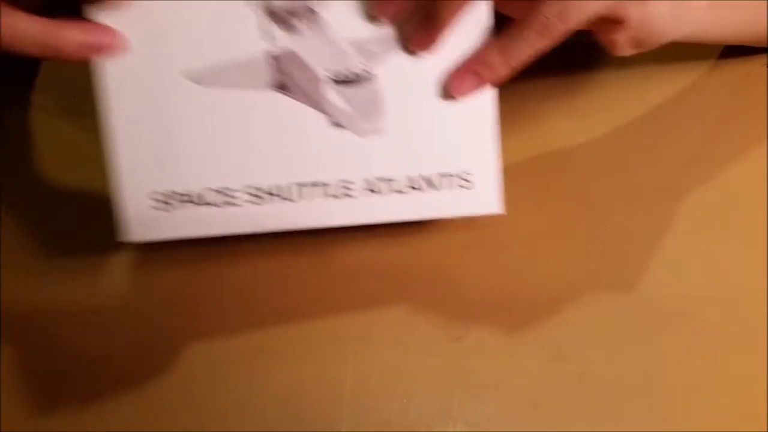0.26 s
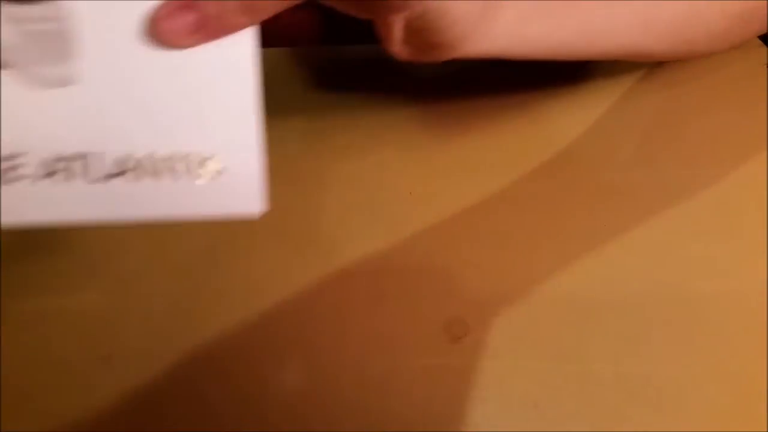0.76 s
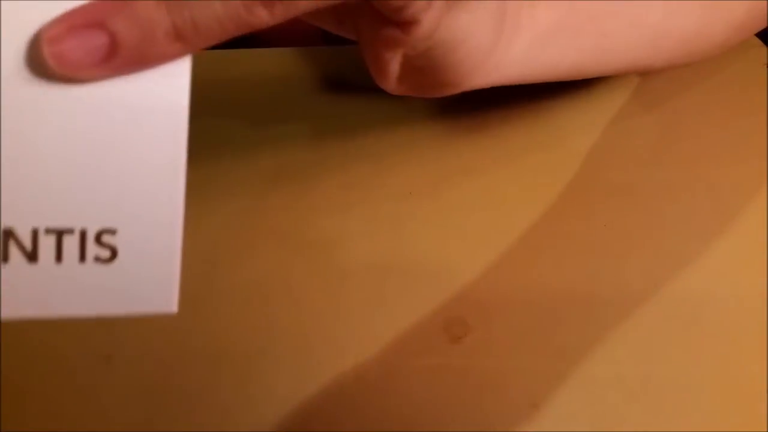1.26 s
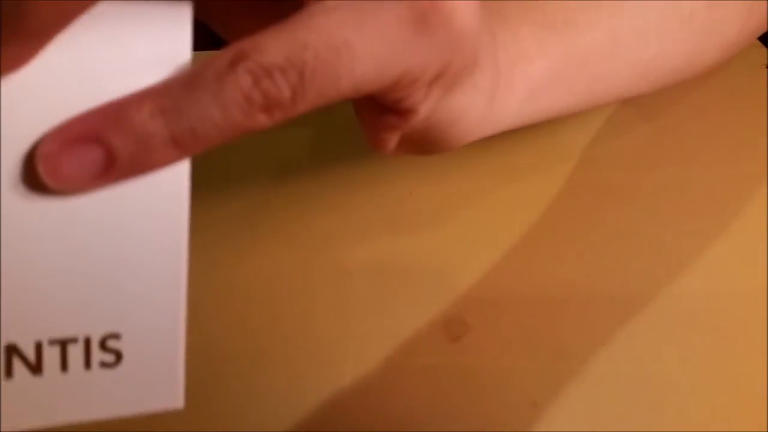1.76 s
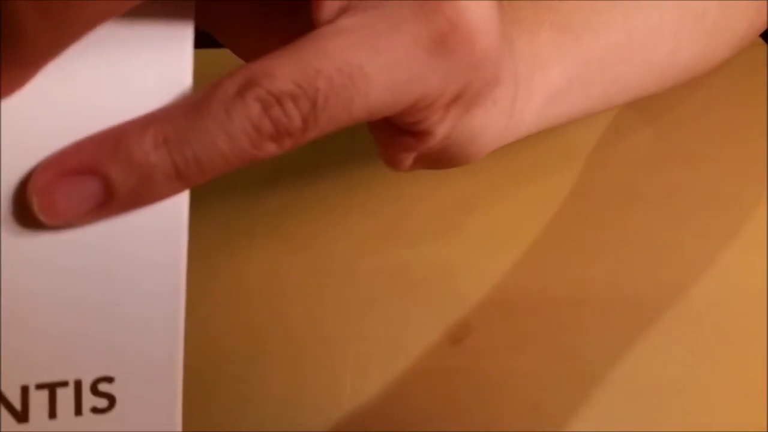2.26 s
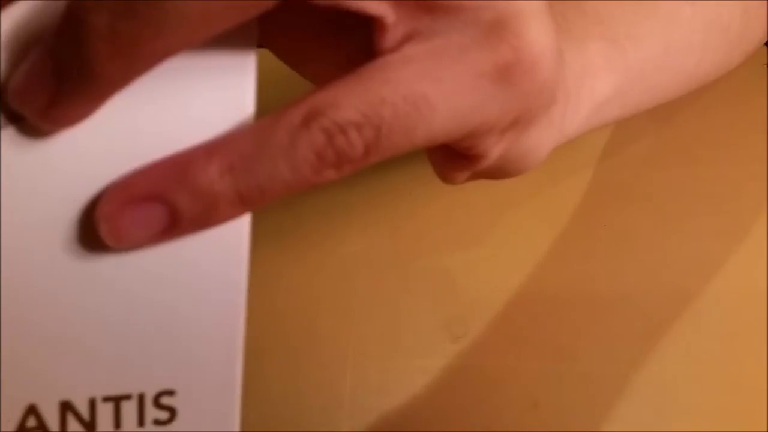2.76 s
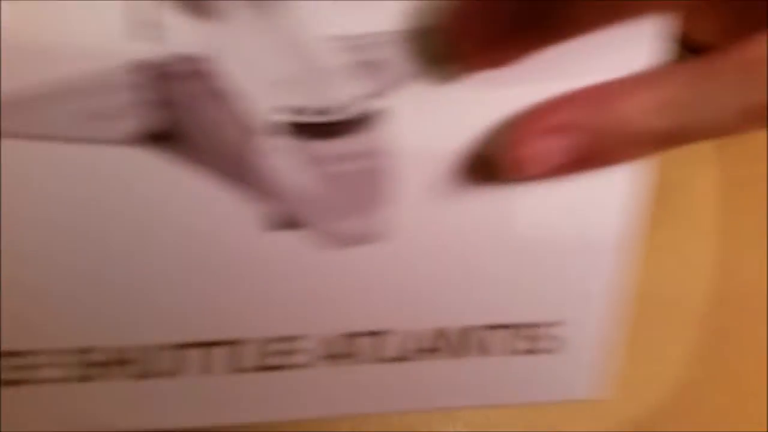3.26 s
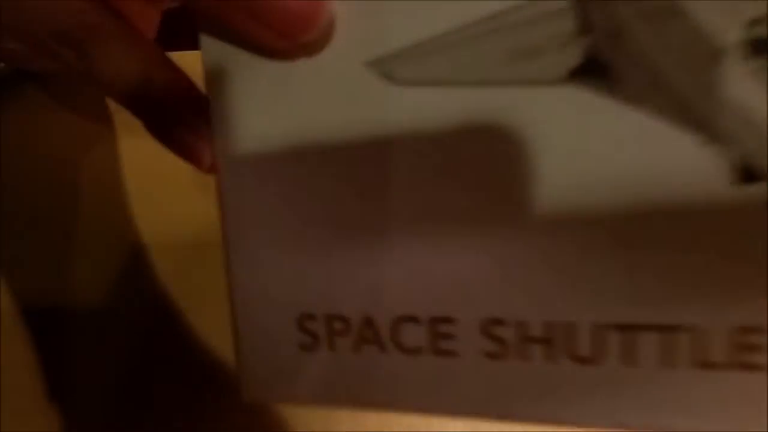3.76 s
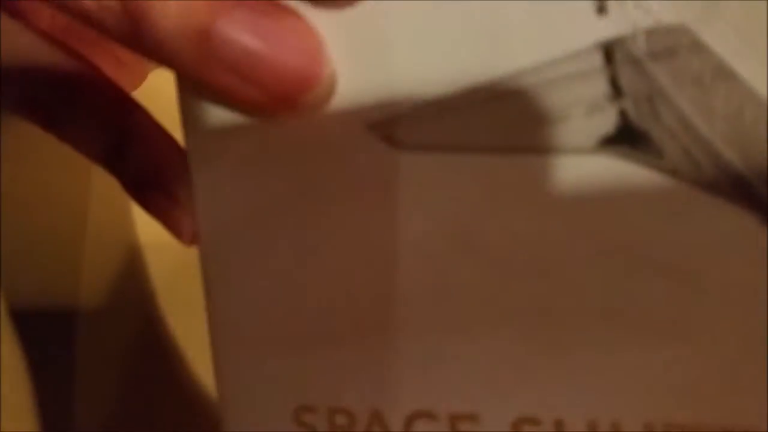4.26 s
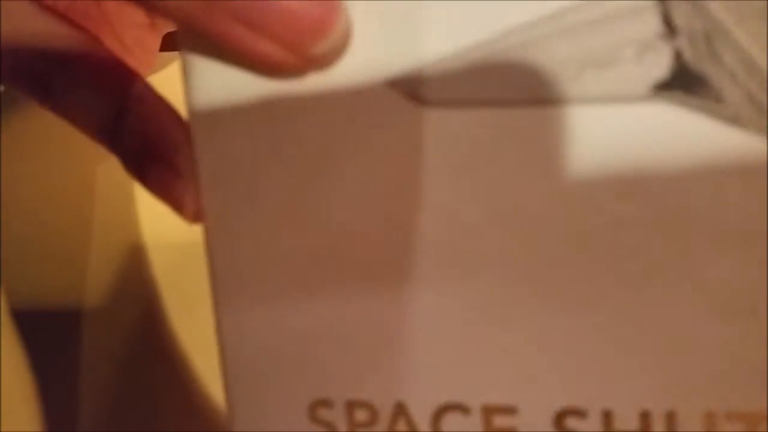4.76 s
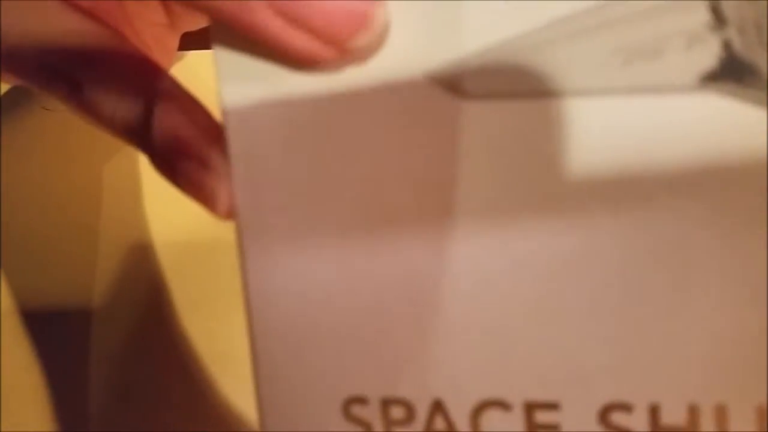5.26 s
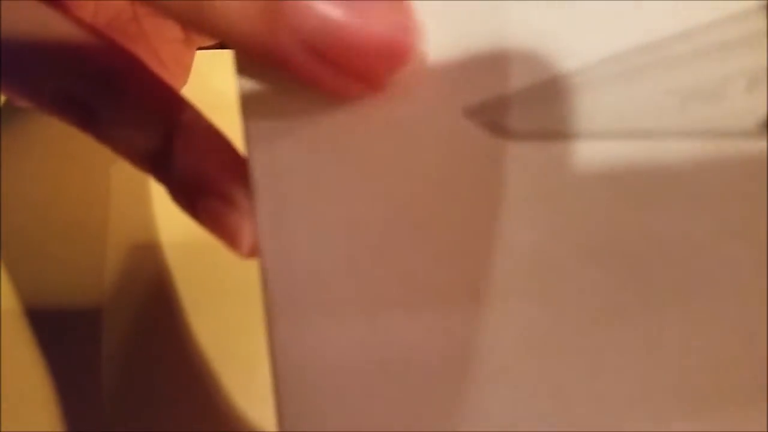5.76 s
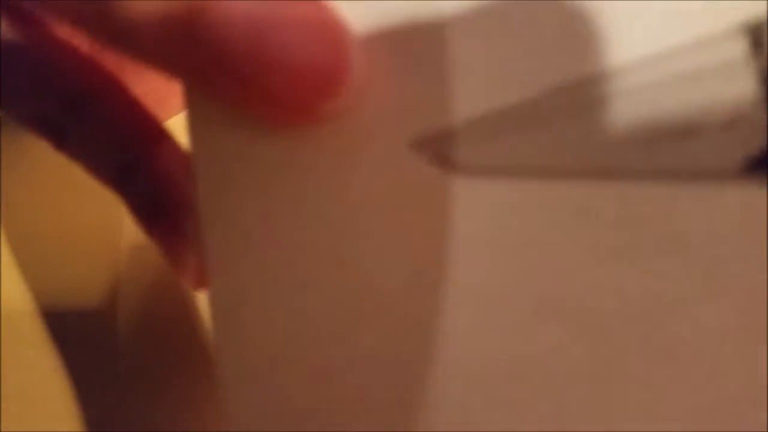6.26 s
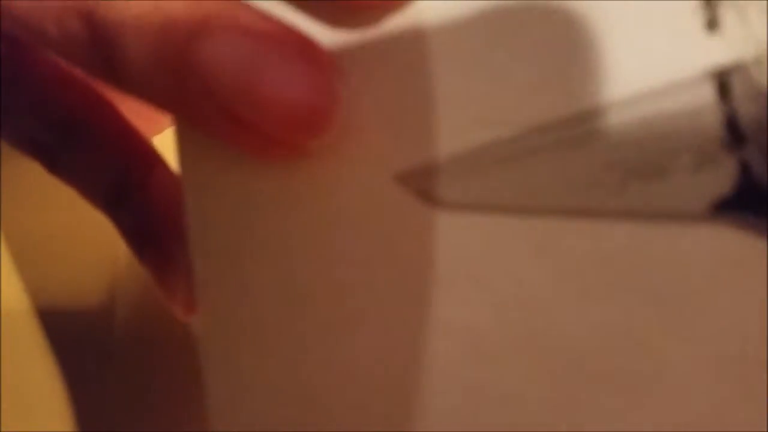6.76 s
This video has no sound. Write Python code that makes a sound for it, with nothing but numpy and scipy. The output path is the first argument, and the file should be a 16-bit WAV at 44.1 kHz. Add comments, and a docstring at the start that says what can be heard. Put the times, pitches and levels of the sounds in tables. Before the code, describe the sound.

Very close to a stereo microphone pair in a quiet indoor room, fingernails tap a small hollow cardboard box. After a faint opening scrape, firm clicky taps come in uneven groups of three on the left, with brief nail scratches between. The box then shifts to the right with soft skin rubbing, and the tapping becomes mostly quieter, denser and more thuddy, with a few strong knocks.

```python
"""Fingernails on a cardboard box

In a quiet room, nails drum on a small box held close to a pair of microphones, first left, then right.
Each tap is a soft push that rings the damped modes of the box, plus a click and short rattle of the nail.
Between taps, nails drag over the card in many small slips, and skin slides on it as shaped noise.
Taps and drags get a tail of sparse reflections; a weaker copy of everything follows a thirtieth
of a second later."""
import sys
import numpy as np
from scipy import signal
from scipy.fft import rfft, irfft
from scipy.io import wavfile
from scipy.ndimage import uniform_filter1d

SR = 44100
rng = np.random.default_rng(int(sys.argv[2]) if len(sys.argv) > 2 else 0)


def master_out(mix):
    """Clip the mix to full scale and print it as 16-bit PCM to the path in sys.argv[1]."""
    frames = np.transpose(np.atleast_2d(mix))
    ceiling = np.clip(frames, -1, 1)
    pcm = np.round(ceiling * 32767).astype(np.int16)
    wavfile.write(sys.argv[1], SR, pcm)


N = 308700  # samples: 7 s


def gain_of(db):
    """Turns dB into an amplitude factor."""
    return 10 ** (np.asarray(db) / 20)


def evened(x):
    """Scales to rms 1."""
    return x / np.sqrt(np.mean(x ** 2) + 1e-20)


def read(points, hz):
    """Reads a table of (Hz, value) along a log-frequency axis."""
    f, value = np.transpose(points)
    return np.interp(np.log(hz + 1), np.log(f + 1), value)


def delayed(hz, seconds):
    """Spectrum of a pure delay; negative seconds move a sound earlier."""
    return np.exp(-2j * np.pi * hz * seconds)


def stroke_gain(middle, length, db):
    """Gain of one stroke: a smooth rise to db at the middle, then a fall."""
    u = np.clip((np.arange(N) / SR - middle) / length, -.5, .5)
    return gain_of(db) * np.cos(np.pi * u) ** 2


def ring(modes, hz, far):
    """Velocity response of damped modes at the nearer microphone (far = 0), or farther off as far grows."""
    s, out = 2j * np.pi * hz, 0
    for mode_hz, t60, db, far_db, way in modes:
        size = np.sign(way) * gain_of(db + far * far_db)
        out = out + size * s / ((s + np.log(1000) / t60) ** 2 + (2 * np.pi * mode_hz) ** 2)
    return out


def noise(colour, same, patchy_db, size):
    """Two channels of random short-time spectra whose level drifts in patches of time and frequency."""
    frames, hz = 4 * N // size + 6, np.fft.rfftfreq(size, 1 / SR)
    a, b, c, d, patches = rng.standard_normal((frames, len(hz), 5)).T
    patches = uniform_filter1d(patches, size=size // 64, axis=0)  # over frequency
    patches = evened(uniform_filter1d(patches, size=10240 // size, axis=1))  # over time
    same = np.clip(read(same, hz), -1, 1)[:, None]
    left = a + 1j * b
    right = same * left + np.sqrt(1 - same ** 2) * (c + 1j * d)
    z = np.array([left, right]) * gain_of(read(colour, hz)[:, None] + patchy_db * patches)
    return evened(signal.istft(z, nperseg=size, noverlap=3 * size // 4)[1][:, :N])


# Place of the box before the pair. Each row: time in seconds, lead of the left microphone in ms
# (negative when the right one leads).
BOX_PLACE = [(0, 0.15), (1, 0.4), (3.3, 0.37), (3.7, -0.38), (4.6, -0.52), (7, -0.46)]


def left_lead_ms(s):
    """Time by which sound from the box reaches the left microphone first."""
    return np.interp(s, *np.transpose(BOX_PLACE))


def panned(x):
    """Leans a friction sound to the microphone nearer the hands, by level alone."""
    left_over_right_db = 11 * left_lead_ms(np.arange(N) / SR)  # 11 dB per ms of lead
    return x * gain_of(np.outer([.5, -.5], left_over_right_db))


# Colour of the quiet behind the box. Each row: frequency in Hz, relative level in dB per Hz.
FLOOR_COLOUR = [(15, -46), (25, -11.5), (38, -18.5), (53, -3.5), (149, -4.5), (175, -14.5), (317, -15),
                (1020, -22.5), (1190, -24), (1400, -25), (5880, -30.5), (6740, -29.5), (16000, -31)]
# Likeness of that quiet at the two microphones. Each row: frequency in Hz, left-right correlation.
FLOOR_LIKENESS = [(60, 0.38), (240, 0.54), (950, 0.0098), (3770, -0.26), (15000, 0.15)]
FLOOR_DB = -62.5  # rms


def floor():
    """Steady, mostly low background noise whose likeness left to right changes with frequency."""
    return gain_of(FLOOR_DB) * noise(FLOOR_COLOUR, FLOOR_LIKENESS, patchy_db=2.13, size=2048)


# Decay of the room around the box. Each row: frequency in Hz, time to fall 60 dB in seconds.
ROOM_DECAY = [(100, 0.16), (300, 0.24), (800, 0.19), (2000, 0.25), (6000, 0.15)]
ROOM_DB = -13.5  # energy of the left tail


def room(x):
    """Sparse reflections of random sign, each band dying at its own speed; the bass is alike left and right."""
    hits = np.zeros((2, 22050))
    at = np.arange(160, 22030, 20) + rng.integers(0, 20, (2, 1094))  # one in every 20 samples
    np.put_along_axis(hits, at, rng.choice([-1., 1.], at.shape), 1)
    hz, t, z = signal.stft(hits, SR, nperseg=256)
    same = (1 / (1 + (hz / 900) ** 2))[:, None]
    z = np.array([z[0], same * z[0] + np.sqrt(1 - same ** 2) * z[1]])
    fade = gain_of(-60 * t / read(ROOM_DECAY, hz)[:, None])
    tail = signal.istft(z * fade, SR, nperseg=256)[1]
    tail = tail / np.linalg.norm(tail[0])
    return gain_of(ROOM_DB) * signal.fftconvolve(x.mean(0)[None], tail, axes=1)[:, :N]


# Colour of skin on card. Each row: multiple of the stroke's brightest frequency, relative level in dB per Hz.
SLIDE_COLOUR = [(.2, -11.5), (.55, -5.5), (1, -2), (1.6, -8), (4, -24)]
# Skin sliding on the glossy card. Each row: middle in seconds, length in seconds,
# level at the middle in dB before panning, brightest frequency in Hz.
SLIDES = [(0.198, 0.32, -67.5, 5000), (0.545, 0.23, -68.5, 7440), (0.746, 0.034, -69, 4970),
          (3.141, 0.22, -61, 4300), (3.267, 0.087, -64, 5770), (3.354, 0.2, -58.5, 7000),
          (3.569, 0.25, -62.5, 8100), (3.796, 0.03, -64, 5970), (3.908, 0.13, -64, 8440),
          (5.976, 0.17, -72, 2490), (6.547, 0.08, -61, 9100), (6.652, 0.05, -67, 8100),
          (6.819, 0.25, -63, 8500), (7, 0.16, -61, 8200)]


def slide():
    """Fine friction hiss, each stroke with its own brightness, little alike at the two microphones."""
    hiss = noise([(100, 0), (16000, 0)], [(1000, 0.37), (10000, 0.15)], patchy_db=4.0, size=512)
    hz, t, z = signal.stft(hiss, SR, nperseg=512)
    frame_at = np.minimum(np.round(t * SR).astype(int), N - 1)
    shape = 0
    for middle, length, db, top_hz in SLIDES:
        points = [(top_hz * multiple, colour_db) for multiple, colour_db in SLIDE_COLOUR]
        colour = evened(gain_of(read(points, hz)))
        shape = shape + np.outer(colour, stroke_gain(middle, length, db)[frame_at])
    return panned(signal.istft(z * shape, SR, nperseg=512)[1][:, :N])


# Nails dragging over the card. Each row: middle in seconds, length in seconds,
# level at the middle in dB before panning and room.
DRAGS = [(0.008, 0.19, -52.5), (0.149, 0.089, -54.5), (0.236, 0.18, -65.5), (0.574, 0.053, -66),
         (0.721, 0.15, -67.5), (1.401, 0.079, -51), (1.823, 0.12, -46), (2.256, 0.081, -56.5),
         (2.708, 0.048, -60.5), (3.126, 0.15, -46), (3.474, 0.14, -63.5), (3.593, 0.038, -62),
         (4.23, 0.12, -51), (4.632, 0.038, -61)]


def drag():
    """Many small uneven slips of the nail, each ringing the box."""
    unevenness = gain_of(3 * np.minimum(rng.exponential(1, N), 3.5))  # up to 10.5 dB
    slips = unevenness * (rng.random(N) < 1500 / SR) * rng.standard_normal(N)  # about 1500 a second
    hz = np.fft.rfftfreq(N, 1 / SR)
    box = ring(BODY_MODES, hz, 0) + gain_of(3.5) * ring(UPPER_MODES, hz, 0)
    box = box / (1 + (hz / 2500) ** 2) + 2e-5 * gain_of(read(NAIL_COLOUR, hz))
    drive = evened(slips) / np.sqrt(np.mean(abs(box) ** 2))  # rms 1 after the box
    strokes = sum(stroke_gain(*row) for row in DRAGS)
    return panned(irfft(rfft(drive * strokes) * box, N))


FIRM_DB = -15  # tap level that counts as firm


def fingertip_push(hz, db, contact_ms, on_right):
    """A raised-cosine force with a sharp peak at its middle; longer contact drives less treble."""
    turns = hz * contact_ms / 1000 + 1e-9
    push = np.sinc(turns) / (1 - turns ** 2) + 0.06 / (1 + turns)
    # in a firm tap on the right, the pad of the finger grazes the card 1.58 ms before
    graze = 0.16 * (on_right and db > FIRM_DB) * delayed(hz, -0.00158)
    return push * (1.5 + graze)


# Modes of the box in four groups. Each row: frequency in Hz, time to fall 60 dB in seconds,
# relative level in dB at the nearer microphone before the trims below, dB change at the farther one,
# sign of the motion (+1 with the struck spot, -1 against it).
DEEP_MODES = [(89.3, 0.028, -11, -23.5, 1), (152, 0.018, 3, -6.5, 1)]
THUD_MODES = [(239, 0.026, 6.5, -4, 1)]
BODY_MODES = [(353.6, 0.051, -4, -2, 1), (400.8, 0.029, 4, -1.5, 1), (454, 0.0038, -28.5, -20, 1)]
UPPER_MODES = [(744.5, 0.011, -2, 2, 1), (885, 0.017, -4.5, -0.5, 1), (1214, 0.0029, -13.5, -8.5, 1),
               (1318, 0.0095, -10.5, 9, -1)]
# The bass grows as the box nears a microphone. Each row: time in seconds, gain of the deep modes in dB.
CLOSENESS = [(0, -6), (4.9, -3), (5.2, 2.5), (7, 4)]
DEEP_PER_THUD = 0.29  # thuddy taps shake the whole box: extra dB of deep modes per dB of thud
LOWEST_PER_CLOSE = 1.5  # the lowest mode takes the closeness dB times this
UPPER_DB, UPPER_PER_THUD, UPPER_PER_MS = 1.5, 1, 2.9  # dB at 1 ms contact, dB per dB of thud, dB per ms
RIGHT_NOTE_DB, RIGHT_NOTE_LONGER = 3, 1.73  # dB, and factor on the decay time


def panels(hz, grip, far, s, contact_ms, thud_db, on_right):
    """Response of the card panels: deep, thud, body and upper modes, each group with its own gain."""
    edge = 1j * hz / (1j * hz + 330)  # a small box radiates its lowest tones weakly
    close_db = np.interp(s, *np.transpose(CLOSENESS)) + DEEP_PER_THUD * max(thud_db, 0)
    lowest = gain_of(LOWEST_PER_CLOSE * close_db) * ring(DEEP_MODES[:1], grip, far)
    deep = gain_of(close_db) * ring(DEEP_MODES[1:], grip, far)
    thud = edge * ring(THUD_MODES, grip, far)
    low_note = np.array(BODY_MODES[0])
    if on_right:  # held there, the lower body note rings freer
        low_note = low_note * [1, RIGHT_NOTE_LONGER, 1, 1, 1] + [0, 0, RIGHT_NOTE_DB, 0, 0]
    body = edge * (ring([low_note], grip, far) + ring(BODY_MODES[1:], grip, far))
    # upper modes grow where the hold mutes the body note, and with long contact
    upper_db = UPPER_DB + UPPER_PER_THUD * max(thud_db, 0) + UPPER_PER_MS * (min(contact_ms, 1.4) - 1)
    # they sound from the whole face and reach the farther microphone with about half the lag of the others
    upper = gain_of(upper_db) * edge * delayed(hz, -0.0002 * far) * ring(UPPER_MODES, grip, far)
    return gain_of(thud_db) * (thud + deep + lowest) + body + upper


# Colour of the hard nail on card. Each row: frequency in Hz, relative level in dB per Hz.
NAIL_COLOUR = [(800, -7.5), (1500, 0), (2400, 2), (3200, -6), (5000, -6.5), (8000, -13.5), (15000, -22)]


def nail_tick(hz, crack, db, far, size):
    """One click, then a short rattle of noise; light taps tick flatter and brighter."""
    age = np.arange(len(crack)) / SR
    # a weaker noise tail dies more slowly, like treble in the room
    fade = gain_of(-60 * age / 0.0067) + gain_of(-17.0 - 60 * age / 0.078)
    rattle = rfft(crack * fade, size)
    colour_db = read(NAIL_COLOUR, hz) * np.clip(1.5 + 0.083 * (db - FIRM_DB), .1, 1.3)
    tick = (3.5 + rattle) * gain_of(colour_db - 4.1 * far)  # the constant is the click
    return tick * delayed(hz, -0.00026)  # the nail ticks just before the middle of the push


# Taps of the fingers. Each row: middle of the push in seconds, peak of the push in dB at the nearer
# microphone, length of contact in ms, gain of the thud and deep modes against the body note in dB.
TAPS = [(0.0078, -31, 0.34, 3), (0.1392, -43, 0.14, -5), (0.1497, -43, 1.1, -4), (0.23, -45.5, 1.6, 6),
        (0.7498, -47, 1.9, 2.5), (0.8314, -53.5, 0.52, -5), (1.1775, -13, 0.96, -4.5),
        (1.2549, -17.5, 1, 3), (1.2858, -4.5, 0.55, -6), (1.6152, -16.5, 1.12, -4), (1.6967, -11.5, 0.6, 1),
        (1.7469, -5, 0.63, -4), (1.928, -41, 0.12, 1), (1.9997, -12, 0.86, -2.5), (2.0823, -11, 0.78, 1.5),
        (2.1609, -4, 0.4, -2.5), (2.4747, -11, 0.59, -2.5), (2.5244, -14.5, 0.54, -0.5),
        (2.577, -6.5, 0.39, 4), (2.9362, -13.5, 0.7, -3), (3.0224, -14, 0.75, 2.5), (3.0779, -19, 0.31, -8),
        (3.13, -24.5, 1.55, 5), (3.7886, -46, 0.32, 0), (3.9649, -39, 0.56, -2), (4.013, -36, 1.3, 3),
        (4.079, -27.5, 1.3, 5), (4.1125, -26.5, 1.3, -1), (4.1594, -3, 0.93, 2.5), (4.3804, -31, 1.06, 3),
        (4.439, -25.5, 1.37, 6), (4.5305, -4.5, 1.03, 3), (4.6815, -28.5, 0.85, 0.5), (4.73, -31, 1.46, 10),
        (4.8092, -25.5, 1.16, 2.5), (4.8907, -11, 0.92, 1.5), (5.067, -36.5, 0.96, -1),
        (5.0729, -28, 1.3, 4.5), (5.1422, -31, 1.14, -2), (5.2081, -24.5, 1.12, 31.5),
        (5.3594, -35, 0.78, 0), (5.3741, -30, 1.24, 3.5), (5.4132, -30.5, 1.24, 0.5),
        (5.4694, -26.5, 1.2, 33), (5.6018, -38.5, 0.91, 7), (5.6364, -29, 1.2, 7), (5.7325, -28.5, 1.1, 4),
        (5.9903, -32, 1.32, 4.5), (6.1946, -33.5, 1.2, 1.5), (6.2195, -31.5, 1.34, 5.5),
        (6.407, -39, 0.66, -6), (6.414, -29.5, 0.84, 8), (6.4593, -25, 1.1, 6), (6.533, -36.5, 1.8, 15),
        (6.56, -31, 1.3, 8), (6.623, -33, 1.55, 1), (6.6558, -36, 0.65, 8), (6.7155, -28.5, 0.91, 15),
        (6.78, -24.5, 1.13, 6), (6.851, -22, 1.1, 27), (6.7939, -39, 2, 5), (6.8692, -33.5, 1.3, 12),
        (6.9387, -37, 2.2, 4)]
# Change of the tick against the push, in dB per dB of tap level: box on the left, box on the right.
TICK_PER_DB = (0.02, -0.0363)
TICK_DB, TICK_SPREAD_DB = -10.5, 1.4  # relative level in a tap at FIRM_DB, random spread
LEAD_SPREAD = 0.19  # fingers land at slightly different spots: random share of the lead


def taps():
    """A soft push of the fingertip rings the panels; the hard nail adds a short crack."""
    size = 8192
    out = np.zeros((2, N + size))
    hz = np.fft.rfftfreq(size, 1 / SR)
    chance = rng.standard_normal((len(TAPS), 3, 1536))
    for (s, db, contact_ms, thud_db), (a, b, c) in zip(TAPS, chance):
        lead_ms = left_lead_ms(s) * (1 + LEAD_SPREAD * a[1])
        on_right = lead_ms < 0
        grip = hz * (1 + .015 * a[0])  # the hold on the box detunes it a little
        tick_db = TICK_DB + TICK_PER_DB[int(on_right)] * (db - FIRM_DB) + TICK_SPREAD_DB * a[2]
        push = fingertip_push(hz, db, contact_ms, on_right)
        start = max(int(s * SR) - 200, 0)  # room for what sounds ahead of the middle
        at = delayed(hz, s - start / SR)
        pushes, ticks = [], []
        # nearer microphone, then the farther one with a partly different crack
        for far, crack in ((0, b), (abs(lead_ms) / .34, .6 * b + .8 * c)):
            arrival = at * delayed(hz, (far > 0) * abs(lead_ms) / 1000)
            box = panels(hz, grip, far, s, contact_ms, thud_db, on_right)
            pushes.append(irfft(arrival * push * box))
            ticks.append(irfft(arrival * nail_tick(hz, crack, db, far, size)))
        push_gain = 1 / pushes[0].max()
        tick_gain = gain_of(tick_db) * 2 / np.linalg.norm(ticks[0])
        both = gain_of(db) * (push_gain * np.array(pushes) + tick_gain * np.array(ticks))
        out[:, start:start + size] += both if lead_ms > 0 else both[::-1]
    # little tone below the lowest mode
    return signal.lfilter(*signal.butter(1, 45, "high", fs=SR), out[:, :N])


def scene():
    """Taps and drags with their room, over the slide and the floor."""
    box = taps() + drag()
    return box + room(box) + slide() + floor()


COPY_S, COPY_DB = 1473.6 / SR, -7.2  # delay in seconds, level in dB
EDGE_HZ = 16100  # top of the band


def record(dry):
    """The sound is mixed with a weaker, later copy of itself; then the band limit."""
    hz = np.fft.rfftfreq(2 * N, 1 / SR)
    bass_loss = 1j * hz / (1j * hz + 40)  # the microphones lose the deepest bass
    with_copy = 1 + gain_of(COPY_DB) * delayed(hz, COPY_S)
    twice = irfft(rfft(dry, 2 * N) * with_copy * bass_loss)[:, :N]
    band = signal.firwin(511, EDGE_HZ, window=("kaiser", 9), fs=SR)
    return signal.oaconvolve(twice, band[None], "same", axes=1)


dry = scene()
out = record(dry)
master_out(out)
```